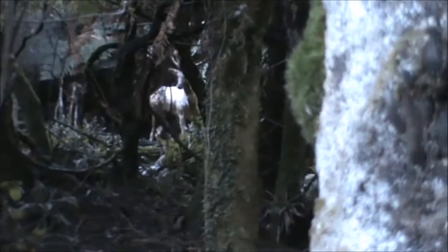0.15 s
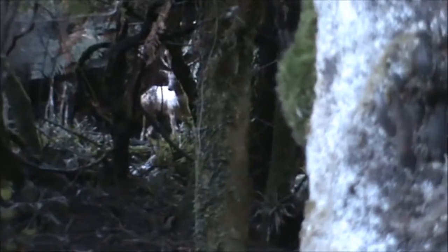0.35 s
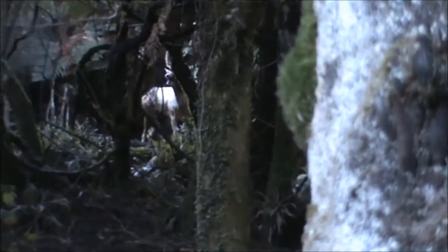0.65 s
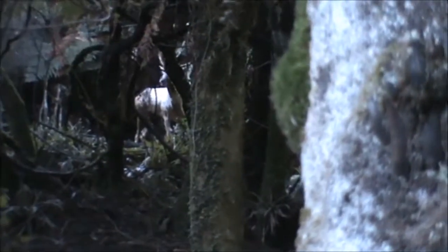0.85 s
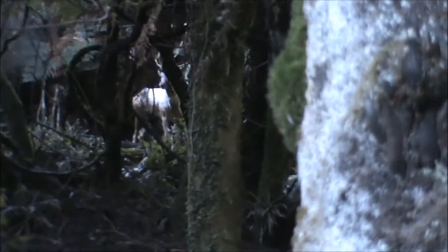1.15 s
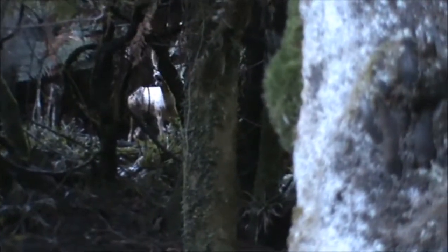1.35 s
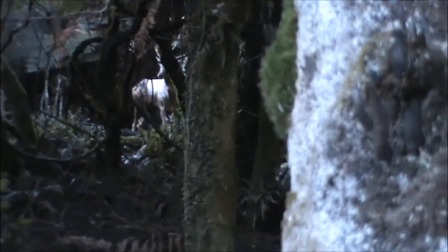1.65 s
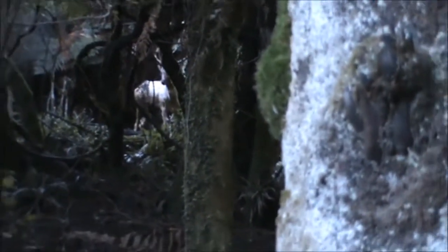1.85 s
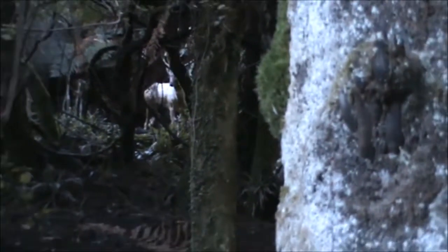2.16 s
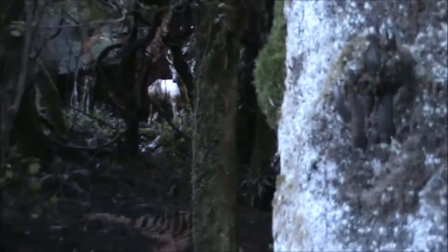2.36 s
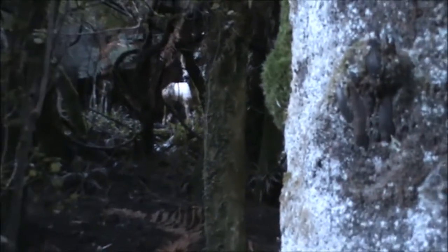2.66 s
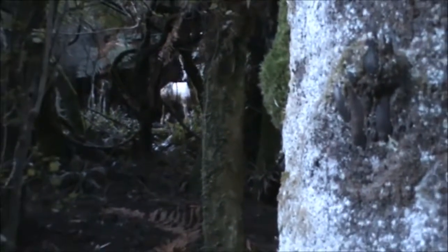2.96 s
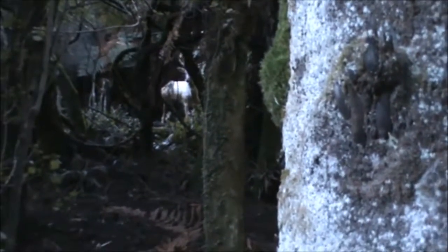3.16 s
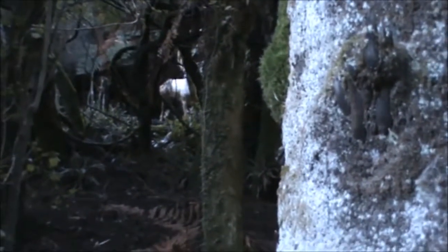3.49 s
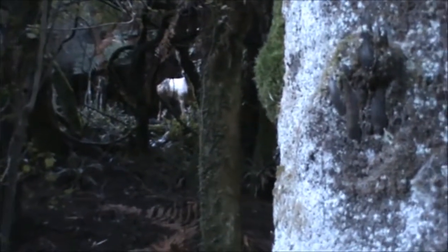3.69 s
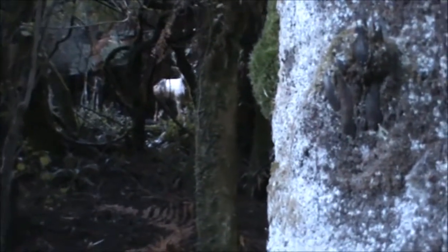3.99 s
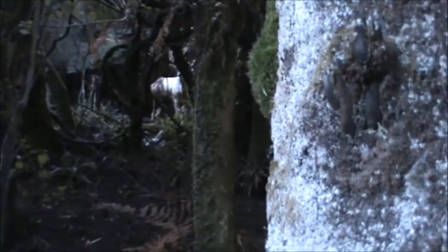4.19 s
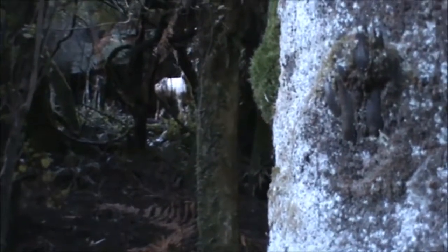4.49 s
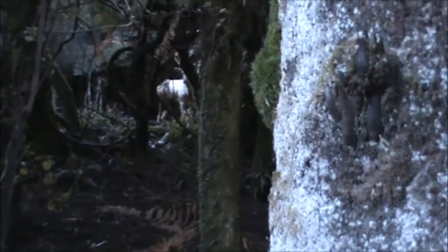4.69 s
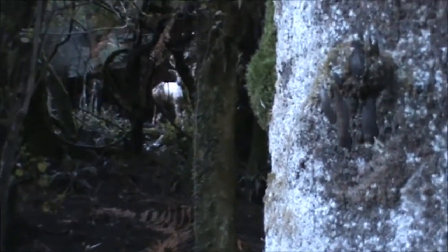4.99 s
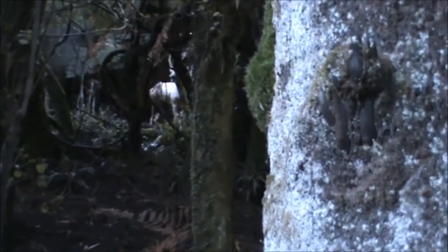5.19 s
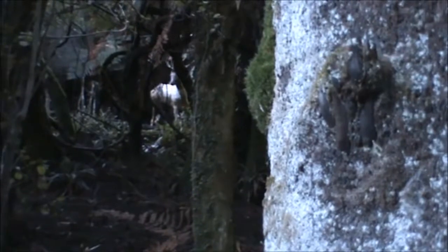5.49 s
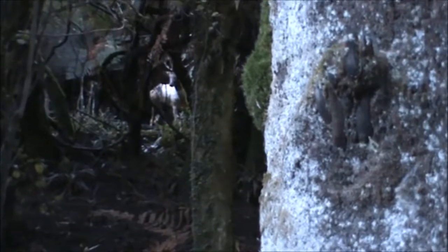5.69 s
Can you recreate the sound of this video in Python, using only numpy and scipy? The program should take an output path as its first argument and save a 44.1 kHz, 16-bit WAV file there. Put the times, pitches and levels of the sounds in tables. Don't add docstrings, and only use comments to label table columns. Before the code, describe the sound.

Small birds chirrup first, then a rutting deer begins short, guttural, snore-like groans, six in all, their pulses slowing as each dies away. Between and beneath them a far buck mutters indistinctly. Twigs tick early on, a double knock comes after the fourth groan and a sharp snap in the fifth. Thin insect pitch, wide hiss and camera motor whine form the background; trees scatter sound into a long faint tail, caught by a small camera microphone.

```python
import sys
import numpy as np
from scipy import signal
from scipy.fft import rfft, irfft
from scipy.io import wavfile
from scipy.ndimage import uniform_filter1d

SR = 44100
rng = np.random.default_rng(int(sys.argv[2]) if len(sys.argv) > 2 else 0)


def makeup_ratio(level_db):
    decades = np.asarray(level_db, float) / 20
    return 10 ** decades


def put_to_file(sound):
    columns = np.atleast_2d(sound).T
    safe = np.clip(columns, -1, 1)
    whole_steps = np.round(safe * 32767)
    wavfile.write(sys.argv[1], SR, whole_steps.astype(np.int16))


N = 257544


def rms_one(x):
    return x / np.sqrt(np.mean(x ** 2) + 1e-20)


def in_time(tables):
    t = np.arange(N) / SR
    s, *columns = np.transpose(np.concatenate(tables))
    on = sum((t >= rows[0][0]) & (t <= rows[-1][0]) for rows in tables)
    return [np.interp(t, s, c) for c in columns], uniform_filter1d(on * 1.0, size=700)


def coloured(x, points, gain=makeup_ratio):
    hz = np.arange(x.shape[-1] // 2 + 1) * SR / x.shape[-1] + 1
    at, value = np.transpose(points)
    weight = gain(np.interp(np.log(hz), np.log(at), value))
    return irfft(rfft(x) * weight, x.shape[-1])


def slow(rate_hz):
    sos = signal.butter(2, np.clip(rate_hz, 1, 5000), fs=SR, output="sos")
    return rms_one(signal.sosfilt(sos, rng.standard_normal(N + SR))[SR:])


def ridge(start, end, db, climb_db_s, sag_db_s):
    t = np.arange(N) / SR
    return db - climb_db_s * np.maximum(start - t, 0) - sag_db_s * np.maximum(t - end, 0)


def tract(x, modes):
    out = 0
    for k, (hz, width_hz, db) in enumerate(modes):
        r = np.exp(-np.pi * width_hz / SR)
        ring = [1, -2 * r * np.cos(2 * np.pi * hz / SR), r * r]
        out = out + (-1) ** k * makeup_ratio(db) * signal.lfilter([1 - r, 0, r - 1], ring, x + 1e-18)
    return out


# (f/Hz, level/dB per Hz)
AIR = [(18, -47), (30, -7.5), (65, -3), (140, -8.5), (650, -9), (1100, -6.5), (1590, -11), (15500, -23)]
# (f/Hz, likeness from -1 to 1)
LIKENESS = [(60, 0.99), (180, 0.73), (400, -0.17), (950, -0.52), (2800, -0.38), (8000, -0.0055),
            (10000, 0.56), (16000, 0.84)]


def air_and_hiss():
    mid, side = coloured(rng.standard_normal((2, N)), AIR)
    mid = coloured(mid, LIKENESS, lambda c: np.sqrt(1 + np.clip(c, -1, 1)))
    side = coloured(side, LIKENESS, lambda c: np.sqrt(1 - np.clip(c, -1, 1)))
    return makeup_ratio(-58) * rms_one(np.array([mid + side, mid - side]))


# (f/Hz, width/Hz, level/dB)
MOTOR = [(843.3, 5.8, -71.5), (1124, 7.2, -80)]


def motor():
    t = np.arange(N) / SR
    out = np.zeros(N)
    for hz, width_hz, db in MOTOR:
        level = makeup_ratio(db + 5 + 0.97 * slow(33.0))
        wander = np.cumsum(width_hz * slow(5.44) / 4) / SR
        out += level * np.sin(2 * np.pi * (hz * t + wander))
    return out


# (t/s, level/dB)
INSECT = [
    (1.6, -95),
    (1.75, -83),
    (2.56, -86),
    (2.75, -98),
]


def insect():
    (level_db,), on = in_time([INSECT])
    level = on * makeup_ratio(level_db + 5.5 + 1.5 * slow(22.0))
    return level * np.sin(2 * np.pi * 6600 * np.arange(N) / SR)


# (full from t/s, until t/s, level/dB)
RIVAL = [
    (-.01, 0.065, -56.5),
    (0.488, 0.892, -54),
    (1.105, 1.596, -64.5),
    (2.59, 2.963, -50.5),
    (3.54, 4.024, -54),
    (4.199, 4.42, -61.5),
    (5.17, 5.644, -55),
]


def rival():
    level_db = np.max([ridge(*row, climb_db_s=95, sag_db_s=68) for row in RIVAL], axis=0)
    lumps = rng.standard_normal((2, N)) * makeup_ratio(1.6 * slow(29.0))
    far = tract(lumps, [(325, 99, 2.5), (488, 91, -0.5), (680, 91, -0.5), (1125, 160, -5.5), (1500, 380, -12.0)])
    mid, side = makeup_ratio(level_db - 3.5) * rms_one(far) * makeup_ratio([[0], [-11.]])
    return np.array([mid + side, mid - side])


# (delay t/s, length t/s, from f/Hz, to f/Hz, level/dB)
CHIRRUP = [
    (0, 0.039, 2230, 2725, -63.5),
    (.015, 0.072, 3300, 6700, -78),
    (.018, .068, 2710, 4880, -67),
]
WARBLE = [
    (0, 0.027, 2060, 2700, -66.5),
    (.013, 0.037, 2250, 2014, -64),
    (.036, .098, 3770, 2900, -67),
    (.04, 0.067, 1930, 1455, -76),
]
# (start t/s, level/dB)
CHIRRUPS = [
    (0.031, 0),
    (1.089, -3.5),
]
WARBLES = [
    (4.652, -1.7),
    (4.875, 0.8),
]
# (start t/s, length t/s, from f/Hz, to f/Hz, level/dB)
WHISTLES = [(0.083, 0.086, 3450, 3390, -70), (1.149, .12, 3290, 3420, -76), (1.204, 0.04, 1930, 1896, -72),
            (3.255, .09, 1930, 2146, -81), (3.698, 0.12, 2636, 2610, -68), (3.862, 0.174, 2503, 2530, -77),
            (4.472, 0.078, 4140, 4110, -73), (4.56, .072, 4060, 3960, -82), (5.145, 0.046, 1930, 2154, -70)]
SCOLDS = [
    (1.474, 0.086, 7600, 9000, -70.5),
    (4.244, .17, 3670, 3350, -71),
    (5.094, 0.055, 3900, 2530, -67),
    (5.4, 0.078, 4200, 2540, -66),
    (5.51, .07, 4200, 2550, -73),
    (5.49, 0.1, 4300, 3850, -73.5),
]


def notes():
    out = [(*n, 12) for n in WHISTLES] + [(*n, 149.4) for n in SCOLDS]
    for phrase, sung, hoarse_hz in ((CHIRRUP, CHIRRUPS, 398), (WARBLE, WARBLES, 40.6)):
        for s, db in sung:
            out += [(s + delay, d, a, b, db + level, hoarse_hz) for delay, d, a, b, level in phrase]
    return out


def birds(settle=3, rise_s=.035, fall_s=0.016):
    out = np.zeros(N)
    for start, length, from_hz, to_hz, db, hoarse_hz in notes():
        t = np.arange(int(length * SR)) / SR
        wobble = signal.lfilter([.2], [1, -.98], rng.standard_normal(20000))[:len(t)]
        glide = to_hz + (from_hz - to_hz) * (1 - t / length) ** settle + 2 * hoarse_hz * wobble
        swell = np.minimum(t / min(rise_s, length / 2), (length - t) / fall_s)
        swell = np.minimum(swell, 1)
        i = int(start * SR)
        out[i:i + len(t)] += makeup_ratio(db + 8.0) * swell * np.sin(2 * np.pi * np.cumsum(glide) / SR)
    return out * makeup_ratio(1.7 * slow(18.0))


# (t/s, f/Hz, peak level/dB)
TWIGS = [
    (1.033, 1110, -49.5),
    (1.045, 90, -54),
    (1.064, 1099, -46.5),
    (2.268, 1500, -54),
    (3.732, 840, -43),
    (3.782, 820, -42),
    (4.349, 3350, -39),
    (5.76, 3130, -55),
]


def twigs():
    out = np.zeros(N)
    t = np.arange(4000) / SR
    for s, hz, db in TWIGS:
        decay_db = 60 * t * hz / (6.2 + 0.011 * hz)
        i = int(s * SR)
        out[i:i + 4000] += (makeup_ratio(db - decay_db) * np.sin(2 * np.pi * hz * t))[:N - i]
    return out


# (start t/s, end t/s)
GROANS = [
    (.55, .92),
    (1.28, 1.64),
    (2.57, 2.9),
    (3.41, 3.76),
    (4.21, 4.5),
    (5.1, 5.43),
]
# (t/s of one strong closure, closures there f/Hz, slowing Hz/s)
FLAP = [(.750, 32.8, 50.9), (1.434, 35.76, 86.85), (2.775, 32.33, 57.85), (3.579, 34.9, 61.15),
        (4.367, 31.4, 39), (5.304, 32.72, 83.5)]
# (t/s, level/dB above the others)
SNAPS = [(.662, 7.5), (0.749, 10.5), (.782, 9), (0.815, -1.5), (2.5993, 0), (2.686, 2), (2.726, -4.5),
         (3.4966, 7), (3.550, 10.5), (3.5786, 9), (3.6072, 5), (3.64, -1.5), (3.674, 6.5), (4.399, 9),
         (4.432, 10), (5.274, 5), (5.338, 3), (5.373, 5)]


def folds(weak_db=-2.5, fade_db_s=52, jitter_s=0.0013, shimmer_db=2.0, puff_s=.007, steady_air=.15):
    clicks = np.zeros(N)
    for (start, end), (anchor, flap_hz, slowing) in zip(GROANS, FLAP):
        t = np.arange(start, end, 1 / SR) - anchor
        half_turns = np.floor(2 * (flap_hz * t - slowing * t ** 2 / 2))
        at = np.flatnonzero(np.diff(half_turns) > 0)
        weak = half_turns[at + 1] % 2
        luck = rng.standard_normal((40, 2))[:len(at)]
        slack_db = np.minimum(weak_db - fade_db_s * (t[at] + anchor - start), 0)
        late = weak * jitter_s * luck[:, 1]
        place = ((t[at] + anchor + late) * SR).astype(int)
        clicks[place] = makeup_ratio(weak * slack_db + shimmer_db * luck[:, 0])
    for s, db in SNAPS:
        i = round(s * SR)
        clicks[i - 440:i + 440] = 0
        clicks[i] = makeup_ratio(db)
    leak = np.exp(-1 / (puff_s * SR))
    return clicks, signal.lfilter([1], [1, -leak], clicks) + steady_air


# (start t/s, length t/s, from f/Hz, to f/Hz, level/dB)
HUM = [(0.582, 0.069, 131, 134, -42.5), (1.32, 0.09, 135, 144, -42), (2.587, 0.13, 123, 136, -40.5),
       (3.438, 0.055, 143, 139, -45), (4.238, 0.13, 141, 141.5, -48.5), (5.128, .106, 146, 130, -43.5)]


def hum():
    curves = []
    for s, d, a, b, db in HUM:
        full = .35
        curves.append([(s, a, db - 9.5), (s + full * d, a + full * (b - a), db), (s + d, b, db - 8.5)])
    (hz, level_db), humming = in_time(curves)
    return humming * makeup_ratio(level_db + 1.0) * np.sin(2 * np.pi * np.cumsum(hz) / SR), humming


# (voice sets in t/s, throat widest t/s, mouth widest t/s, chest fullest t/s, voice lets go t/s)
MOMENTS = [(.579, 0.675, 0.689, .775, .83), (1.31, 1.39, 1.41, 1.46, 1.578),
           (2.606, 2.692, 2.745, 2.77, 2.81), (3.446, 3.564, 3.572, 3.61, 3.67),
           (4.235, 4.314, 4.31, 4.29, 4.445), (5.122, 5.264, 5.29, 5.31, 5.34)]
# (from t/s, until t/s)
RASPING = [(.655, 0.77), (1.385, 1.44), (2.719, 2.785), (3.551, 3.61), (4.33, 4.33), (5.22, 5.31)]
# (chest level/dB, throat level/dB, mouth level/dB, rasp level/dB)
STRENGTH = [(-41.5, -35.5, -41, -50), (-42, -37.5, -46, -49.5), (-41.5, -37, -43.5, -49.5),
            (-41.5, -39, -40, -47), (-46.5, -59, -59, -54.5), (-43, -45, -47, -52.5)]
# (climb dB/s, sag dB/s)
SLOPES = [
    (45, 64),
    (130, 119),
    (150, 103),
    (105, 133),
]


def effort():
    levels = np.full((4, N), -200.)
    for (begin, throat, mouth, chest, end), rasp, strength in zip(MOMENTS, RASPING, STRENGTH):
        voiced = ridge(begin, end, 0, climb_db_s=1250, sag_db_s=339)
        spans = (chest, chest), (throat, throat), (mouth, mouth), rasp
        parts = [voiced + ridge(*span, db, *slope) for span, db, slope in zip(spans, strength, SLOPES)]
        levels = np.maximum(levels, parts)
    return levels


def evened(x):
    power = uniform_filter1d(uniform_filter1d(x ** 2, size=2000), size=2000)
    return x / np.sqrt(power + 1e-14)


def sinking(x, modes, progress, drop):
    high, low = (tract(x, np.array(modes) * [1 + way * drop, 1, 1]) for way in (1, -1))
    return np.sqrt(1 - progress) * high + np.sqrt(progress) * low


# (f/Hz, width/Hz, level/dB)
CHEST = [(64.4, 94, -18.5), (102.6, 44, 1)]
NECK = [(202, 27, -0.85)]
THROAT = [(371.7, 75, -1), (475.6, 70.5, -1), (598, 28, -9)]
MOUTH = [(1181, 54, 9.7), (1255, 28, 0.5)]
# (f/Hz, width/Hz, level/dB)
RASP = [
    [(2070, 118, 7.3)],
    [(3070, 466, 3), (3350, 217, 5.5), (3621, 83, 7), (4400, 114, -2)],
    [(4800, 140, -6), (5550, 370, -10.5), (5935, 350, -10.5), (8140, 190, -12.5), (9400, 680, -27)],
    [(2420, 110, 5.9)],
]
# (f/Hz, width/Hz)
NOTCHES = [(1650, 130), (2760, 170), (3970, 190), (6850, 680)]
# (low rasp level/dB, high rasp level/dB, neck ring level/dB, cheek ring level/dB)
COLOUR = [(2, 4.5, -13.5, -5), (-0.5, 2.5, -16, -6), (-3.5, 5.5, -4, 3), (-2.5, 1, -2, -1),
          (-12, 4, -6, -4), (-4.5, 6.5, -0.5, -1.5)]


def buck():
    chest_db, *upper = effort()
    throat_db, mouth_db, rasp_db = upper - chest_db
    opening_hum, humming = hum()
    colours = [[(a, 0, *c), (b, 1, *c)] for (a, b), c in zip(GROANS, COLOUR)]
    (progress, low_db, high_db, neck_db, cheek_db), on = in_time(colours)
    clicks, puffs = folds()
    air = puffs * rng.standard_normal(N)

    push = np.roll(clicks + 0.021 * air, -int(0.00426 * SR))
    push = signal.sosfilt(signal.butter(2, 250., fs=SR, output="sos"), push)
    chest = tract(push, CHEST) + makeup_ratio(neck_db) * tract(push, NECK) + 0.5 * tract(push, [(97, 141, 0.)])
    voice = (1 - 0.3 * humming) * evened(chest)

    throat = sinking(clicks + 0.061 * air, THROAT, progress, drop=0.03)
    voice += makeup_ratio(throat_db + 0.5) * evened(tract(throat, [(502, 237, 0.)]))
    mouth = sinking(clicks + 0.06 * air, MOUTH, progress, drop=0.023)
    voice += makeup_ratio(mouth_db) * evened(tract(mouth, [(1172, 256, 0.)]))

    band_db = low_db + 8.8 * (progress - .5), 0, high_db - 2.6 * (progress - .5)
    lumpy = [makeup_ratio(db + 0.4 * slow(33.0)) for db in band_db]
    lumpy.append(-lumpy[0] * makeup_ratio(cheek_db))
    breath = clicks + 0.27 * air
    rasp = sum(gain * sinking(breath, modes, progress, drop=0.024) for gain, modes in zip(lumpy, RASP))
    for hz, width_hz in NOTCHES:
        rasp = rasp - tract(rasp, [(hz, width_hz, 0)])
    voice += makeup_ratio(rasp_db + 0.5) * evened(rasp)
    return on * makeup_ratio(chest_db - 1.5) * voice + opening_hum


# (f/Hz, side level/dB against mid)
SPREAD = [(200, -38), (400, -28.5), (700, -12), (1300, -17), (2400, -11.5), (5000, -23), (8000, -1.5),
          (12000, -37)]


def forest(x, near_db, near_t60, tail_db, tail_t60):
    t = np.arange(SR) / SR
    near = makeup_ratio(near_db - 60 * t / near_t60) * rng.standard_normal((2, SR)) * (t > .002)
    tail = makeup_ratio(tail_db - 60 * t / tail_t60) * rng.standard_normal((2, SR)) * np.minimum(t / 0.0086, 1)
    tail = coloured(tail, [(100, -3.0), (400, -8.5), (1300, -11.5), (3000, -7.0), (8000, -19.0)])
    mid, side = near * makeup_ratio([[-9], [0]]) + tail * makeup_ratio([[0], [5.]])
    side = coloured(side, SPREAD)
    mid[0] += 1
    return signal.fftconvolve(x[None], np.array([mid + side, mid - side]), axes=1)[:, :N]


def scene():
    background = air_and_hiss() + motor() + insect()
    song = makeup_ratio(1.0) * forest(birds(), near_db=-24.0, near_t60=0.4, tail_db=-42.0, tail_t60=1.0)
    deer = makeup_ratio(1.0) * forest(buck() + twigs(), near_db=-23.5, near_t60=0.24, tail_db=-51.5, tail_t60=1.67)
    return background + rival() + song + deer


def roll_off(x):
    return signal.sosfilt(signal.butter(12, 16880, fs=SR, output="sos"), x)


def record(dry):
    thin = signal.sosfilt(signal.butter(2, 30., "high", fs=SR, output="sos"), dry)
    cut = signal.sosfilt(signal.ellip(12, .5, 70, 15700, fs=SR, output="sos"), thin)
    return roll_off(cut)


dry = scene()
out = record(dry)
put_to_file(out)
```